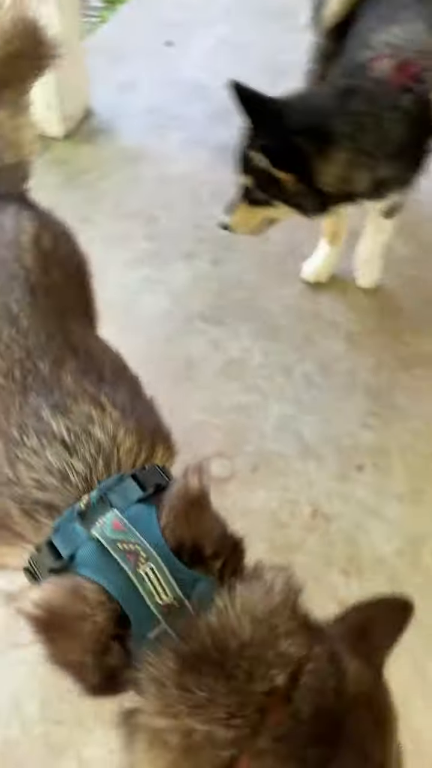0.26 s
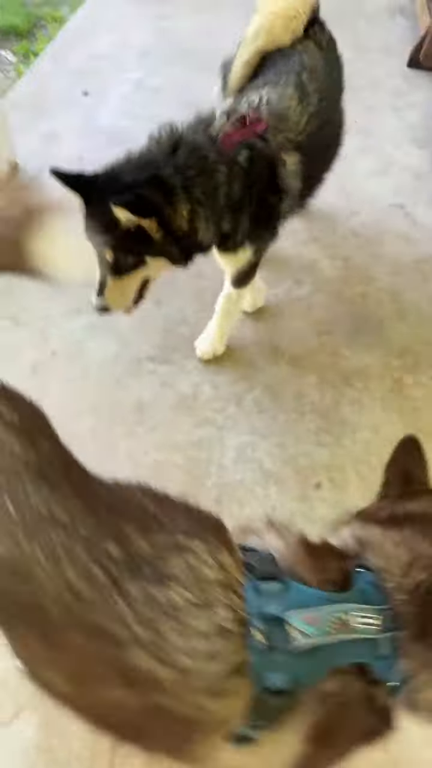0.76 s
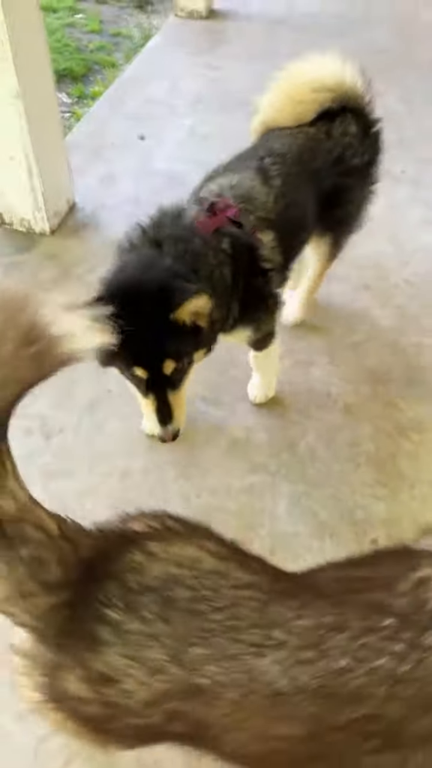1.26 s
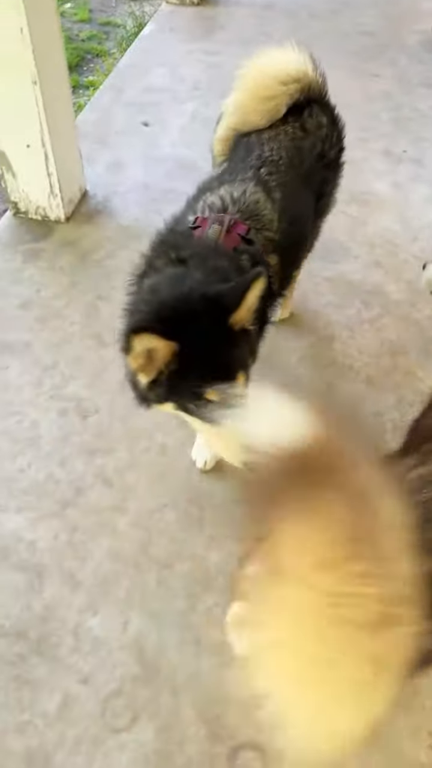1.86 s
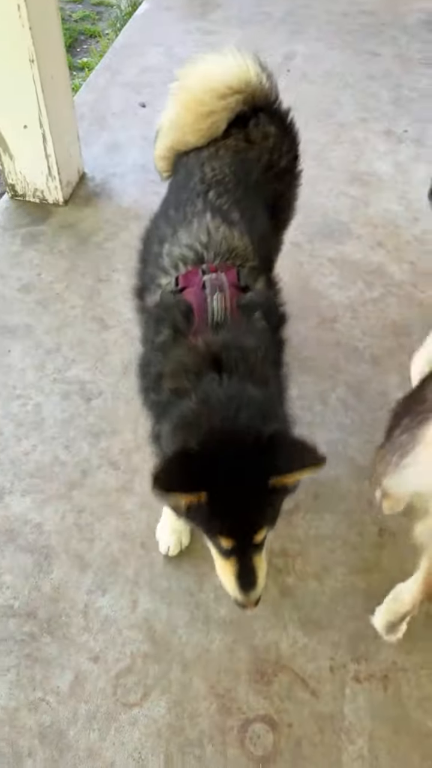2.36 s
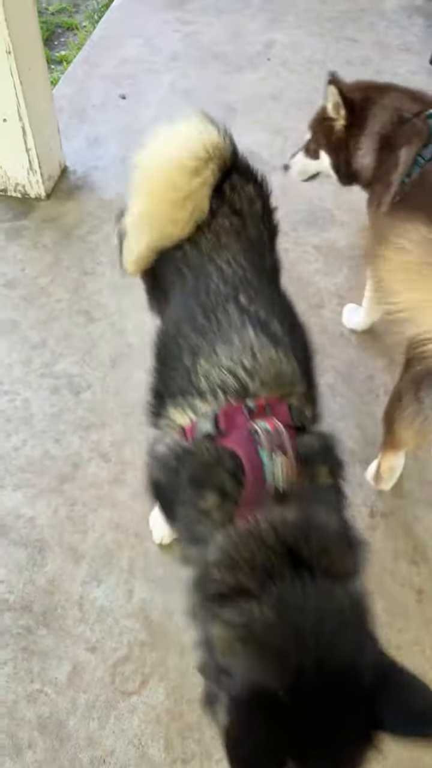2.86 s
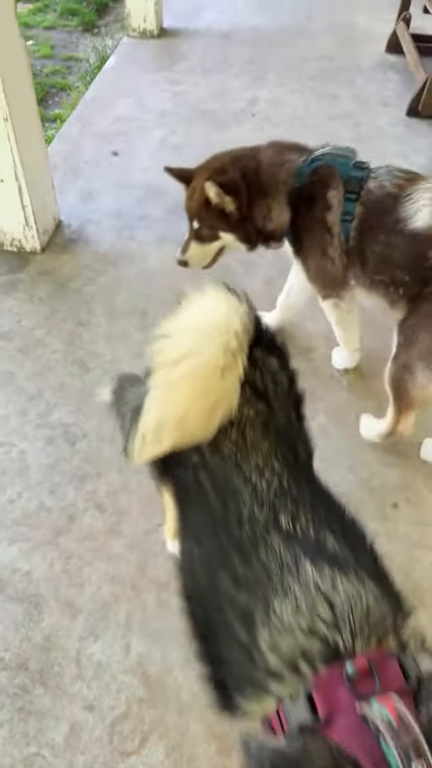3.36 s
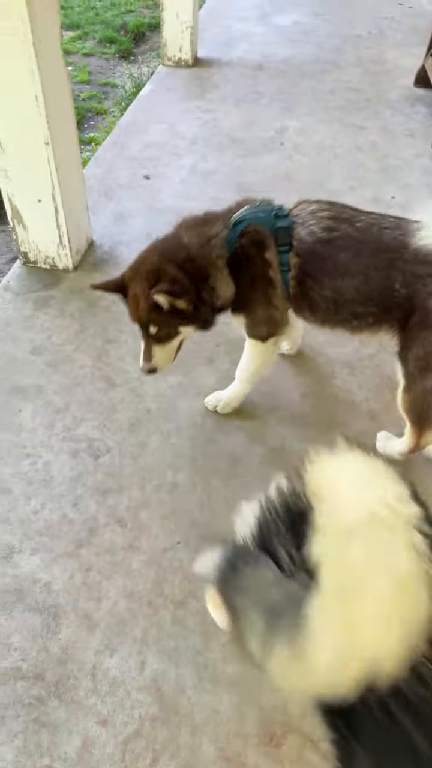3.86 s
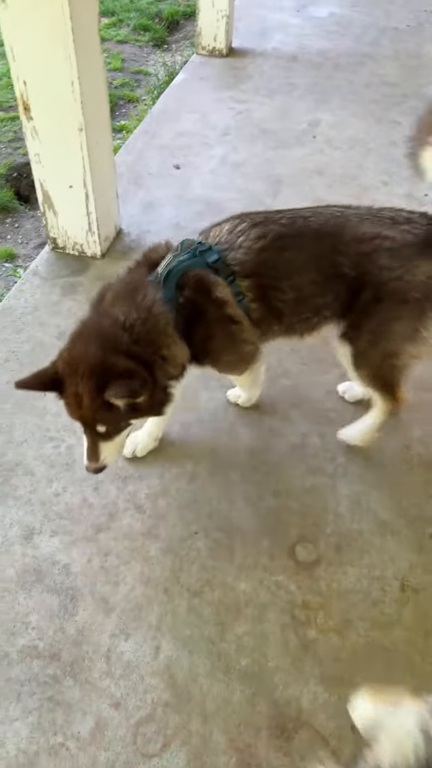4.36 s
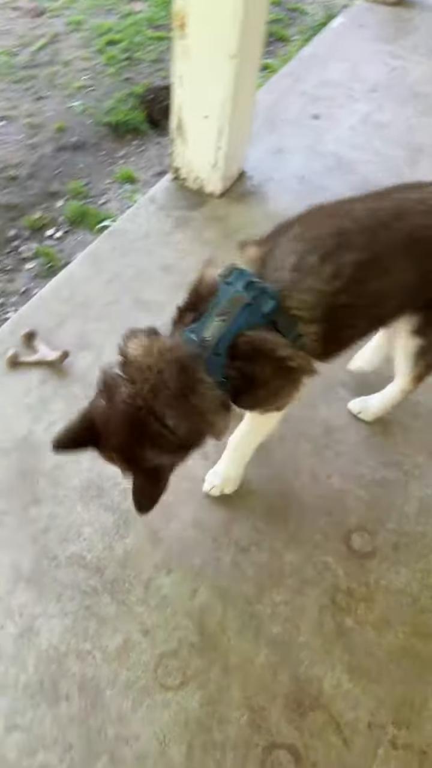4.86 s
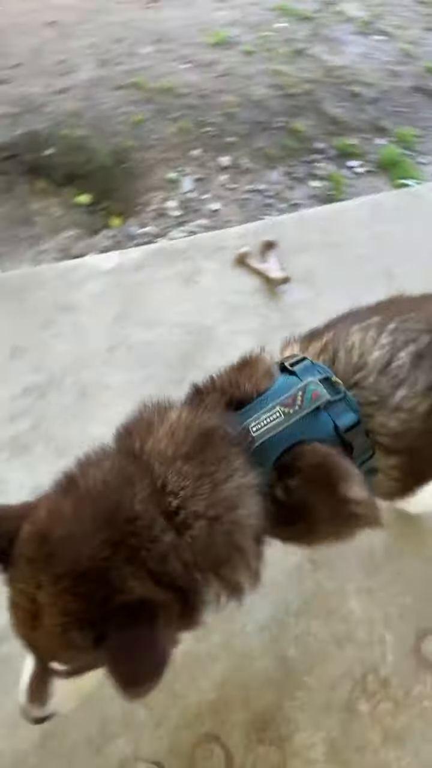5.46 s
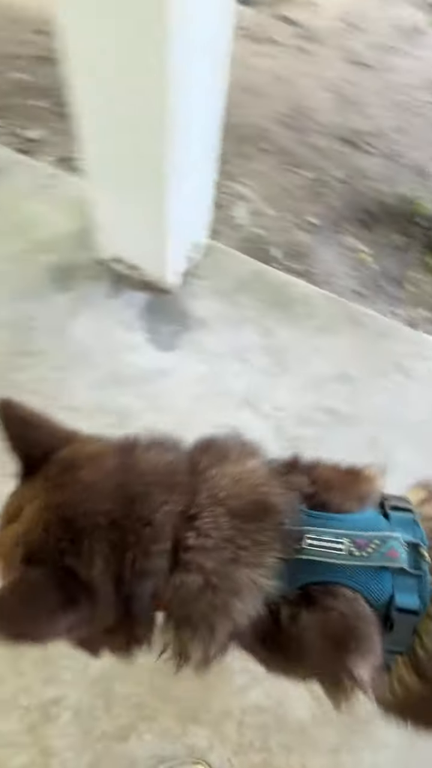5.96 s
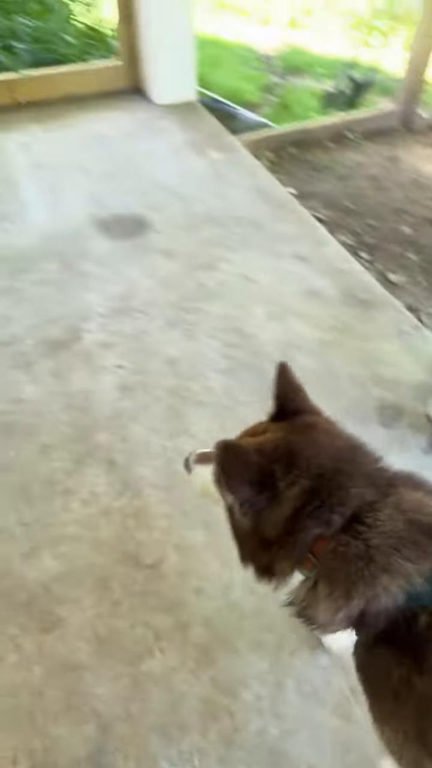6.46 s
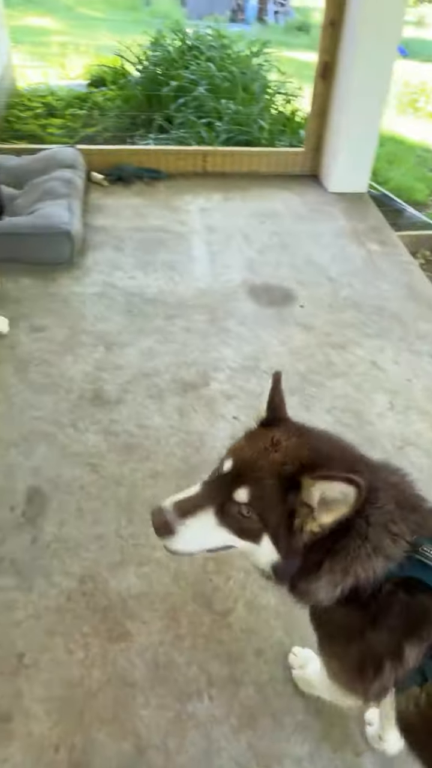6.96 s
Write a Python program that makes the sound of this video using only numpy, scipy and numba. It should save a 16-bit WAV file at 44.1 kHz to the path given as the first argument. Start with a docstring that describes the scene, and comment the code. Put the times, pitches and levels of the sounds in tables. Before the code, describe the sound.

Several dogs mill about close to a handheld phone on a roofed concrete porch. Gritty pad scuffs and sharp claw ticks cluster at the start, then thin out to soft panting and faint tag clinks. A heavy, hollow thump lands close by past the middle, followed by brighter tag jingles and renewed scuffing. Small birds whistle and warble in the garden beyond, over a faint outdoor wash.

```python
"""Dogs pant on a roofed concrete porch beside a phone: noise coloured like air swells and falls, and the
same hiss gives scuffs and the thump their airy top. Metal tags clink (ringing modes), pads scuff and claws
tick on the slab (tiny impacts and short cracks through resonances), and one heavy thump lands close by
(a wavering boom and broad resonances). Birds warble far off in the garden (noise in narrow moving bands)
over a soft wash and low foot rumble (shaped noise)."""
import sys
import numpy as np
from scipy import signal
from scipy.fft import rfft, irfft
from scipy.io import wavfile
from scipy.ndimage import uniform_filter1d
from numba import njit

SR = 44100
rng = np.random.default_rng(int(sys.argv[2]) if len(sys.argv) > 2 else 0)


def put_to_file(sound):
    """Save the sound as 16-bit audio at rate SR, in the file named by the first command-line argument."""
    columns = np.atleast_2d(sound).T  # one column per channel
    safe = np.clip(columns, -1, 1)
    whole_steps = np.round(safe * 32767)
    wavfile.write(sys.argv[1], SR, whole_steps.astype(np.int16))


N = 317608  # length in samples


def panting_and_airy_hiss():
    """Rushing air makes a slightly fluttering hiss; its level is set by the part above 12 kHz."""
    # colour of rushing air: (frequency [Hz], level per Hz [dB])
    air_colour = [(88, -64), (150, -4.5), (833, -1), (955, -1.5), (1780, -6.5), (2300, -4.5), (5850, -1.5),
                  (7250, -3.5), (13300, -9), (15800, -8)]
    # hiss swells, panting and the airy top of scuffs:
    # (peak time [s], level before a 1 dB lift [dB], rise per 30 dB [s], fall per 30 dB [s])
    hiss_rows = [(0, -91, 0.026, .08), (.106, -70, 0.019, .3), (.23, -59.5, 0.18, 0.084),
                 (.324, -73, .15, .9), (.464, -66, 0.65, 0.12), (.524, -70, 0.026, 0.042),
                 (.608, -67.5, 0.058, 0.15), (.85, -78.5, 0.28, .25), (1.022, -63.5, .065, 0.14),
                 (1.248, -67.5, 0.47, 0.16), (1.438, -69, 0.23, 0.094), (1.554, -77, .06, 0.19),
                 (1.708, -72.5, 0.067, 0.14), (1.878, -80, 0.23, .11), (2.01, -82, .05, .2),
                 (2.116, -71.5, 0.21, 0.064), (2.344, -73.5, 0.085, 0.21), (2.626, -70, 0.023, 0.15),
                 (2.812, -78, 0.074, 0.21), (2.976, -78.5, 0.62, 0.064), (3.14, -68, 0.065, 0.19),
                 (3.312, -68.5, 0.34, 0.084), (3.484, -73.5, 0.098, 0.15), (3.636, -72, 0.06, 0.35),
                 (3.818, -69.5, 0.025, .09), (4.156, -68.5, 0.075, .12), (4.344, -69, 0.17, 0.11),
                 (4.564, -75.5, 0.19, .045), (4.93, -71, .3, 0.33), (5.086, -72, .6, .3),
                 (5.184, -65.5, 0.37, 0.36), (5.356, -67.5, 0.22, 0.2), (5.68, -75.5, 0.33, .5),
                 (5.822, -66, .09, 0.2), (6.166, -65.5, 0.22, 0.28), (6.33, -72.5, 0.3, 0.21),
                 (6.592, -68.5, 0.17, 0.12), (6.708, -68.5, 0.11, 0.19), (6.846, -72, 0.13, 0.055),
                 (7.02, -68, .02, .15), (7.128, -63.5, 0.15, 0.064)]
    # the thump's burst of hiss, same columns: (peak time [s], level [dB], rise [s], fall [s])
    burst_rows = [(4.66, -89, .03, .3), (4.717, -45, 0.058, 0.26), (4.762, -44, 0.1, 0.13)]
    air = coloured(air_colour)
    top = signal.sosfilt(signal.butter(4, 12000, "high", fs=SR, output="sos"), air)
    level_db, _ = swells([*hiss_rows, *burst_rows], -107)
    flutter_db = 2.2 * walk(60)
    return air / np.std(top) * undb(level_db + 1.0 + flutter_db)


def tags():
    """Small metal tags knock and chatter for a moment; each knock wakes their modes differently."""
    # ringing modes of the tags, lowest first: (centre of a close pair [Hz], time to fade 60 dB [s])
    tag_modes = [(7504, 0.058), (8740, 0.14), (9561, 0.052), (10220, 0.096), (11050, 0.043)]
    # clinks: (time [s], lowest mode's blow [dB], strongest upper blow [dB], its frequency [Hz], tick [dB])
    # all three levels are before the final mix
    clinks = [(.005, -63, -89, 11050, -95), (0.418, -50, -75, 8740, -73), (0.524, -74, -63, 10220, -68),
              (0.5436, -57, -82, 8740, -81), (0.688, -59, -63, 11050, -75), (.7796, -62, -68, 10220, -77),
              (0.849, -81, -57, 10220, -57), (1.0864, -81, -62, 8740, -81), (1.15, -49.5, -57, 11050, -69),
              (1.362, -54, -56, 11050, -64), (1.505, -56.5, -68, 11050, -76), (1.668, -62, -65, 10220, -58),
              (1.704, -52, -59.5, 8740, -68), (1.858, -67, -64, 10220, -87),
              (2.001, -61.5, -72, 10220, -58), (2.244, -63.5, -71, 10220, -63),
              (2.515, -68, -90, 8740, -99), (2.795, -61, -70, 11050, -79), (2.942, -80, -68, 9561, -78),
              (3.2135, -73, -56, 8740, -71), (3.41, -72, -84, 8740, -85), (3.5184, -64, -71, 8740, -79),
              (3.677, -86, -58.5, 11050, -61), (4.0966, -60.5, -70, 11050, -72),
              (4.244, -88, -67.5, 8740, -81), (4.375, -83, -62.5, 9561, -60), (4.411, -58, -71, 11050, -81),
              (4.8694, -70, -54.5, 10220, -66), (4.9556, -46, -53.5, 8740, -52),
              (4.993, -46, -47.5, 10220, -55), (5.1669, -53, -45, 11050, -34),
              (5.1812, -41.5, -37.5, 10600, -46), (5.308, -56, -54, 8740, -71), (5.45, -82, -68, 9561, -74),
              (5.616, -54, -81, 8740, -73), (5.715, -56, -57, 8740, -75), (6.019, -65, -61, 9000, -55),
              (6.431, -50.5, -67, 11050, -94), (6.4792, -44.5, -56, 11050, -69),
              (6.7264, -49, -57, 11050, -66), (6.9162, -69, -70, 11050, -90),
              (7.0211, -41.5, -49, 11050, -68), (7.0816, -49.5, -63, 9200, -67)]
    slope_db_per_khz, scatter_db = 7, 2.5  # upper modes weaken away from the strongest, with some luck
    blows = np.zeros((len(tag_modes) + 1, N))  # one track per mode, and a last one for the ticks
    noise = rng.standard_normal((len(clinks), len(blows), 3000))
    t = np.arange(3000) / SR
    fade = np.exp(-t / 0.023) * (1 - np.exp(-t / 0.001))
    upper_hz = np.array(tag_modes)[1:, 0]
    scatter = scatter_db * rng.standard_normal((len(clinks), len(upper_hz)))
    for (start_s, low_db, top_db, top_hz, tick_db), chatter, luck in zip(clinks, noise, scatter):
        away_khz = np.abs(upper_hz - top_hz) / 1000
        # luck counts less for modes close to the strongest frequency
        upper_db = top_db - slope_db_per_khz * away_khz + luck * np.minimum(away_khz, 1)
        levels_db = [low_db, *upper_db, tick_db]
        for track, db, hits in zip(blows, levels_db, chatter):
            add(track, int(start_s * SR), undb(db) * hits * fade)
    # each mode is a close pair, so the ring beats
    modes = 0
    for blow, (hz, t60) in zip(blows, tag_modes):
        modes = modes + ring(blow, hz - 35, t60) + 0.72 * ring(blow, hz + 40, t60)
    ticks = signal.sosfilt(signal.butter(2, 7000, "high", fs=SR, output="sos"), blows[-1])
    return undb(-2.5) * modes / np.linalg.norm(fade) + undb(-7.0) * ticks


def scuffs():
    """Rough pads catch and slip on the sandy slab; brightness and pad resonance move from scuff to scuff."""
    # pads sliding: (start of full level [s], grit [dB], rise per 30 dB [s], fall per 30 dB [s], hold [s],
    #                pad rumble over grit [dB], brightness [dB], pad centre [Hz])
    slides = [(0, -70, .1, 0.17, 0.02, 4.5, 4, 480), (0.145, -54, 0.07, .3, .01, -14, 6, 670),
              (0.168, -49, 0.091, 0.2, .02, 3.5, 9.5, 604), (0.193, -51, 0.11, 0.16, 0.034, 9, 6, 523),
              (0.313, -44, 0.023, 0.22, 0.017, -1, -6.5, 710), (0.355, -47, 0.21, 0.088, .02, -3, -8, 630),
              (.447, -55.5, 0.069, 0.063, 0.015, 4.5, 11, 510),
              (0.591, -61.5, 0.058, 0.19, 0.034, 7.5, 4.5, 590), (0.82, -70, 0.96, .3, 0.0088, 1, 1, 815),
              (1.024, -57.5, 0.17, 0.066, 0.009, 1.5, 3, 730),
              (1.207, -43, 0.018, 0.074, 0.043, -3, 10, 750), (1.288, -58, 0.12, 0.28, .01, 0, 3.5, 730),
              (1.654, -65.5, 0.27, 0.25, 0.018, 3, -28, 700),
              (2.224, -71.5, 0.2, 0.15, 0.0088, 8, -30, 726), (2.63, -73, 0.17, 0.3, 0.019, -14, 2, 730),
              (2.89, -70, .12, 0.09, 0.013, 4, 0, 770), (3.07, -74.5, 0.065, 0.25, .03, 11, 8.5, 444),
              (3.267, -77, .15, 0.57, 0.025, 14, 16, 620), (3.637, -70.5, 0.075, .6, 0.018, -11, 2, 740),
              (3.865, -74, 0.74, .5, 0.018, 3, 4, 730), (4.153, -77.5, 0.52, 0.43, 0.024, -6, 14.5, 700),
              (4.312, -67.5, 0.11, 0.11, 0.015, -4, 7, 680), (4.715, -41, 0.064, 0.27, 0.0077, -3, 7, 700),
              (4.736, -36, 0.069, 0.2, 0.0082, 0.5, 7, 497),
              (4.796, -43.5, 0.21, 0.098, .015, 3, -1.5, 730),
              (5.019, -53, 0.018, .07, 0.0078, -2.5, 6, 640), (5.156, -61, 0.13, 0.027, 0.0089, -1, 8, 683),
              (5.329, -55, .115, 0.23, 0.017, -9, 4, 766), (5.374, -57, 0.18, 0.12, 0.023, 1.5, 0, 720),
              (5.658, -69.5, 0.15, 0.98, .02, 6.5, 7, 704), (5.833, -71, .13, 0.16, 0.029, 19.5, -9, 740),
              (5.915, -79, .1, .12, .01, 8, 4, 736), (5.974, -68, .2, .3, .02, -4, 5, 650),
              (6.063, -50.5, 0.041, 0.27, 0.046, -4, -1, 696), (6.14, -48, 0.26, 0.14, 0.032, -2, -1, 736),
              (6.245, -54, 0.73, 0.099, 0.028, 1, -9, 720),
              (6.564, -59.5, 0.053, 0.22, 0.011, 6.5, 4.5, 470), (6.835, -69, 0.13, 0.32, .01, 2, -9, 680),
              (7.033, -65, .2, 0.44, .02, -2, -4, 634), (7.099, -50.5, 0.034, 0.064, 0.03, -5, 6, 490)]
    # resonances of sand under the pad, dull one first: (centre [Hz], width of one pass [Hz], level [dB])
    grit_modes = [(1723, 2510, 8.5), (2610, 1180, -4.5), (3310, 1800, -4.5), (5900, 15000, -12.5)]
    # resonances of the soft pad: (centre [Hz], width of one pass [Hz], level [dB])
    pad_modes = [(252.4, 15.3, -2.5), (486, 480, 14.5), (783, 1000, 4)]
    shuffle_grit_db, shuffle_pad_db = -84.5, -81.5  # average floors: faint stirring between scuffs
    pad_lag_s, blend_s = 0.0082, 0.017  # the pad follows the grit; its colour glides between scuffs

    start_s, db, rise, fall, hold, over_db, bright_db, pad_hz = np.transpose(slides)
    presses = np.transpose([start_s + pad_lag_s, db + over_db, rise, fall])
    slide_db, slide = swells(slides, -120, hold[:, None])
    press_db, press = swells(presses, -120, hold[:, None])
    bright_db, pad_hz = uniform_filter1d([bright_db[slide], pad_hz[press]], max(int(blend_s * SR), 1))
    grit_db = np.maximum(slide_db, shuffle_grit_db + 2 * walk(10))
    pad_db = np.maximum(press_db, shuffle_pad_db + 2 * walk(6))

    slips = grains(.5, 0.81) * undb(2.0 * walk(120))
    # coarse and fine grit catch at different moments, so the colour shifts
    dull = body(slips * undb(2.0 * walk(45)), grit_modes[:1])
    sharp = body(slips * undb(2.0 * walk(45)), grit_modes[1:])
    grit = (dull + undb(bright_db) * sharp) / np.std(dull)
    knocks = grains(.1, 0.82)
    steady_pad = unit(body(knocks, pad_modes))
    gliding_pad = moving(knocks, pad_hz, 2.22)
    pad = undb(-3.5) * steady_pad + undb(-7.5) * gliding_pad
    return grit * undb(grit_db) + pad * undb(pad_db - 3.5)


def claws():
    """A claw tip snaps on concrete: a short crack through a resonance that dies at once."""
    # claw ticks: (time [s], peak of the snap [dB], resonance [Hz])
    ticks = [(.172, -34, 2330), (.207, -43, 2200), (.309, -36, 2160), (.618, -50, 2460), (1.272, -46, 2820),
             (1.378, -52, 686), (1.644, -50, 1670), (1.647, -47.5, 810), (3.74, -56, 1620),
             (5.018, -42, 2500), (5.018, -44, 3430), (5.277, -51, 2110), (5.725, -48.5, 710),
             (6.04, -39.5, 2730), (6.571, -42.5, 3900), (7.029, -54, 2840), (7.098, -38.5, 2640)]
    out = np.zeros(N)
    t = np.arange(600) / SR
    cracks = rng.standard_normal((len(ticks), 600))
    for (start_s, db, hz), crack in zip(ticks, cracks):
        snap = ring(crack * np.exp(-t / 0.0046), hz, 16.0 / hz)  # fades 60 dB in 16 cycles
        tip = np.diff(crack, prepend=0) * np.exp(-t / .0015)  # the sharp, bright edge
        add(out, int(start_s * SR), undb(db) * (snap / np.abs(snap).max() + 0.091 * tip))
    return out


def thump():
    """A heavy soft blow shakes a hollow body; a boom near 148 Hz wavers in pitch and strength."""
    # swells of the blow: (peak time [s], level [dB], rise per 30 dB [s], fall per 30 dB [s])
    blow_rows = [(4.7, -51, .03, .3), (4.746, -26.5, 0.061, 0.12), (5, -64, 0.13, 0.039)]
    # resonances of the hollow body: (centre [Hz], width of one pass [Hz], level [dB])
    hollow_modes = [(118, 75, -10), (173.4, 27, -4.5), (276.5, 44, -8.5), (532, 52, -15), (997, 200, -9.5),
                    (1146, 48, -9.5), (1458, 41, -15.5)]
    boom_hz = 148.2 * (1 + 0.04 * walk(40))
    boom = np.sin(2 * np.pi * np.cumsum(boom_hz) / SR) * undb(3.1 * walk(50))
    knock = unit(body(grains(0.042, 1.6), hollow_modes))
    level_db, _ = swells(blow_rows, -120)
    return (undb(-1.5) * boom + knock) * undb(level_db)


def bird(notes):
    """A far whistle, smeared by leaves and echoes into a broken, wavering band; each note bends in one arc."""
    edge_s, fade_db = 0.01, -0.5  # soft start and end; level change along a note
    hz, spread, gain = np.full(N, 4000.), np.full(N, 500.), np.zeros(N)
    for start_s, length, first, middle, last, width, db in notes:
        u = np.arange(int(length * SR)) / (length * SR)  # runs from 0 to 1 along the note
        at = slice(int(start_s * SR), int(start_s * SR) + len(u))
        bend = middle - (first + last) / 2
        hz[at] = first + (last - first) * u + 4 * u * (1 - u) * bend
        spread[at] = width
        edges = np.tanh(np.sin(np.pi * u) * length / (np.pi * edge_s))
        gain[at] = undb(db + fade_db * (u - .5)) * edges
    hz = hz + .12 * spread * walk(70)
    narrow = svf(rng.standard_normal(N), hz, spread)
    tone = svf(narrow, hz, spread) + 0.13 * narrow
    # a wider band passes more noise, so its gain falls
    return tone * np.sqrt(SR / spread) * gain * undb(-8.0 + 2.6 * walk(60))


def birds():
    """A low and a high line of whistled notes echo among the trees."""
    # low notes: (start [s], length [s], first [Hz], middle [Hz], last [Hz], spread [Hz],
    #             level before bird()'s trim [dB])
    low_notes = [(.5, .3, 4000, 4130, 3900, 1500, -61.5), (.8, 0.35, 4100, 4100, 4170, 1350, -63),
                 (1.3, 0.16, 3240, 2860, 2680, 900, -63.5), (1.48, 0.066, 3320, 4100, 4480, 420, -56),
                 (1.545, 0.069, 4480, 4000, 3050, 520, -58), (1.69, 0.094, 2720, 3130, 2500, 500, -68.5),
                 (2.14, 0.28, 3200, 2590, 2350, 260, -73), (2.465, 0.089, 2900, 3350, 3450, 600, -60),
                 (2.535, 0.15, 3440, 2600, 2730, 700, -59.5), (2.64, 0.16, 2850, 3680, 4800, 800, -59),
                 (2.8, 0.49, 4800, 4750, 4800, 420, -67.5), (3.07, 0.29, 4660, 4450, 4600, 650, -64),
                 (3.26, 0.22, 4800, 4500, 3630, 855, -63.5), (3.71, 0.054, 2930, 3220, 4200, 450, -59),
                 (3.755, .075, 4360, 4320, 4530, 400, -60.5), (3.89, 0.12, 2320, 2960, 3100, 410, -59.5),
                 (4.06, 0.13, 2450, 2800, 2700, 330, -70), (5.43, 0.074, 3880, 3730, 3540, 284, -63.5),
                 (5.545, 0.049, 2790, 2840, 2900, 200, -61), (5.6, 0.032, 2980, 3080, 3230, 160, -54),
                 (5.645, 0.21, 2640, 2540, 2600, 312, -67), (6.42, 0.12, 3000, 2900, 3230, 300, -72),
                 (6.61, 0.087, 2970, 2920, 2900, 200, -60.5), (6.69, 0.043, 3100, 3780, 2950, 300, -56.5),
                 (6.905, .06, 2780, 2770, 2750, 200, -68)]
    # high notes, same columns: (start [s], length [s], first [Hz], middle [Hz], last [Hz], spread [Hz],
    #                            level [dB])
    high_notes = [(.04, .16, 5200, 4950, 5000, 500, -70), (.65, 0.49, 4770, 4800, 4600, 298, -67.5),
                  (1.55, 0.21, 5200, 4800, 4860, 600, -72), (1.97, 0.085, 5070, 4940, 4900, 350, -72),
                  (2.4, 0.15, 4940, 4860, 4970, 300, -73), (2.64, 0.16, 5000, 5200, 5300, 503, -70),
                  (2.8, 0.14, 5450, 5530, 5550, 550, -66.5), (2.96, .13, 5550, 5640, 5450, 550, -63.5),
                  (3.08, 0.35, 5270, 5430, 5100, 1000, -63), (3.63, 0.14, 5170, 5100, 5000, 755, -63.5),
                  (3.83, 0.096, 5430, 5600, 5700, 250, -69), (4.03, 0.059, 4930, 4780, 4800, 250, -62.5),
                  (4.26, 0.19, 4800, 4900, 4970, 300, -75), (4.46, 0.091, 4900, 4800, 4740, 302, -76),
                  (4.535, 0.046, 5600, 5550, 5560, 263, -68), (5.57, 0.11, 5000, 5200, 5250, 400, -69),
                  (6.33, .17, 4840, 4900, 4840, 350, -75.5), (6.505, 0.053, 4880, 4870, 4600, 200, -57),
                  (6.562, 0.032, 5770, 5600, 5840, 450, -58), (6.78, 0.049, 5050, 4800, 4700, 298, -72.5),
                  (6.885, .065, 5670, 5580, 5600, 250, -66.5)]
    return echoes(bird(low_notes) + bird(high_notes), t60=0.62, db=-7.5)


def garden():
    """Distant outdoor wash, flickering a little, and the low rumble of feet, both shaped from noise."""
    # colour of the wash: (frequency [Hz], level per Hz [dB])
    wash_colour = [(18, -50), (30, -25), (81, -1), (309, 1), (628, 3), (931, 3.5), (1990, -9), (2730, -10),
                   (4150, -26), (4860, 0), (6310, -35), (7580, -10.5), (12500, -28), (15800, -29.5)]
    # foot rumble: (peak time [s], level before a 1.5 dB cut [dB], rise per 30 dB [s], fall per 30 dB [s])
    footfalls = [(0, -69, .1, .12), (.23, -71, .19, 3.6), (1.11, -66.5, 0.3, 0.64), (3.11, -85, 0.61, .8),
                 (4.95, -64.5, .1, 0.55), (5.37, -68.5, 0.067, 0.18), (5.86, -61, 0.25, 0.25),
                 (6.2, -70, 0.8, 1.5), (7.15, -67.5, 0.57, 0.047)]
    wash_db = -74  # average level [dB]
    wash = unit(coloured(wash_colour)) * undb(wash_db + 1.5 * walk(12))
    rumble_db, _ = swells(footfalls, -90)
    low = unit(body(rng.standard_normal(N), [(78.5, 18, -4), (142, 330, 13.0)]))
    return wash + low * undb(rumble_db - 1.5 + 6.0 * walk(17))


def echoes(x, t60, db):
    """Surroundings return a dull noise tail that fades 60 dB in t60 seconds, for half a second at most."""
    t = np.arange(int(.5 * SR)) / SR
    tail = rng.standard_normal(len(t)) * np.exp(-np.log(1000) * t / t60) * (t > .004)
    tail = signal.lfilter([1], [1, -.4], tail)  # softens the treble
    return x + undb(db) * signal.fftconvolve(x, tail / np.linalg.norm(tail))[:N]


def swells(rows, floor_db, hold=0):
    """Level in dB of events that rise, hold and fall away, and which event is loudest at each moment."""
    swell_db = 30  # rise and fall times are counted over this many dB
    t = np.arange(0, N, 32) / SR  # one value every 32 samples
    peak_s, db, rise, fall = np.transpose(rows)[:4, :, None]
    before = (peak_s - t) / np.abs(rise)
    after = np.maximum(t - peak_s - hold, 0) / np.abs(fall)
    each = db - swell_db * np.where(t < peak_s, before, after)
    level_db = np.repeat(np.maximum(each.max(0), floor_db), 32)[:N]
    loudest = np.repeat(each.argmax(0), 32)[:N]
    return uniform_filter1d(level_db, size=64), loudest


def undb(db):
    """Turn dB into gain."""
    return 10 ** (np.asarray(db) / 20)


def unit(x):
    """Scale to an rms (average strength) of 1."""
    return x / np.sqrt(np.mean(x ** 2))


@njit
def svf(x, hz, width):
    """State-variable band-pass with a moving centre and width, gain 1 at the centre."""
    y, band, low = np.empty(len(x)), 0., 0.
    for i in range(len(x)):
        g, k = np.tan(np.pi * hz[i] / SR), width[i] / hz[i]
        v = (band + g * (x[i] - low)) / (1 + g * (g + k))
        band, low, y[i] = 2 * v - band, low + 2 * g * v, k * v
    return y


def moving(x, hz, q):
    """A moving resonance, applied twice; the gain is evened out as it moves and the rms is set to 1."""
    once = svf(x, hz, hz / q)
    twice = svf(once, hz, hz / q)
    return unit(twice / np.sqrt(hz))


def body(x, modes):
    """Sum of resonances, each applied twice."""
    out = 0
    for hz, width, db in modes:
        b, a = signal.iirpeak(hz, hz / width, SR)
        twice = signal.lfilter(b, a, signal.lfilter(b, a, x))
        out = out + undb(db) * twice / np.sqrt(width)
    return out


def ring(x, hz, t60):
    """A mode struck by x that fades 60 dB in t60 seconds; a unit blow rings with size 1."""
    p, w = np.exp(-np.log(1000) / (t60 * SR)), 2 * np.pi * hz / SR
    return signal.lfilter([0, p * np.sin(w)], [1, -2 * p * np.cos(w), p * p], x)


def coloured(spectrum):
    """Noise with the given spectrum."""
    hz = np.fft.rfftfreq(N, 1 / SR) + 1  # + 1 avoids the log of zero
    points_hz, points_db = np.transpose(spectrum)
    gain = undb(np.interp(np.log(hz), np.log(points_hz), points_db))
    return irfft(rfft(rng.standard_normal(N)) * gain, N)


def walk(rate):
    """A random wander towards a new level about `rate` times a second, scaled to rms 1."""
    k = int(SR / rate)
    steps = np.repeat(rng.standard_normal(N // k + 1), k)
    return unit(uniform_filter1d(steps, k)[:N])


def grains(share, spread_db):
    """Dense tiny impacts of uneven size, on a given share of the samples."""
    chance = rng.random((N, 2))
    size = undb(-spread_db * np.log(1 - chance[:, 1]))
    return (chance[:, 0] < share) * rng.standard_normal(N) * size


def add(track, start, piece):
    """Mix a piece into a track."""
    track[start:start + len(piece)] += piece[:len(track) - start]


def scene():
    """Everything near the phone sounds under the roof; the birds echo among trees beyond."""
    near = panting_and_airy_hiss() + tags() + scuffs() + claws() + thump()
    under_roof = echoes(near, t60=0.1, db=-12)
    return (under_roof + birds() + garden())[None]


def record(dry):
    """The phone drops the deepest bass and cuts the top."""
    thin = signal.sosfilt(signal.butter(3, 55, "high", fs=SR, output="sos"), dry)
    return signal.sosfilt(signal.ellip(10, .2, 70, 15780, fs=SR, output="sos"), thin)


dry = scene()
out = record(dry)
put_to_file(out)
```